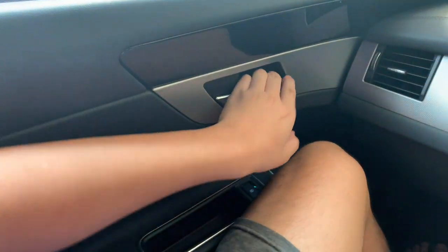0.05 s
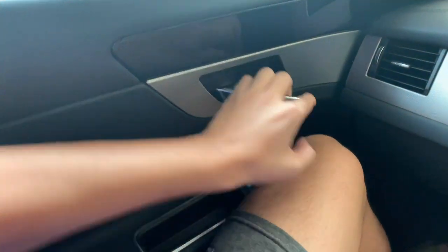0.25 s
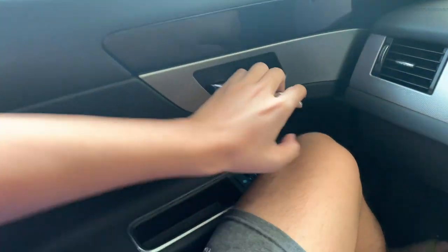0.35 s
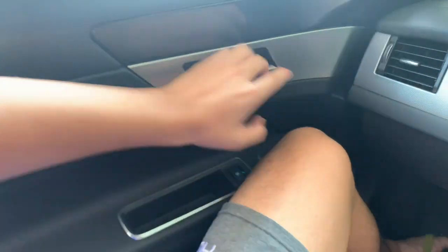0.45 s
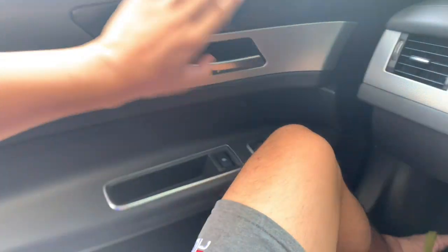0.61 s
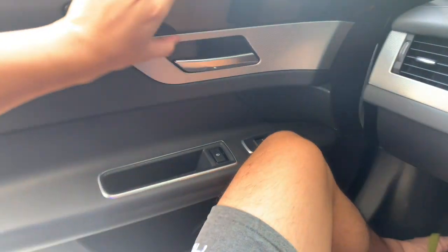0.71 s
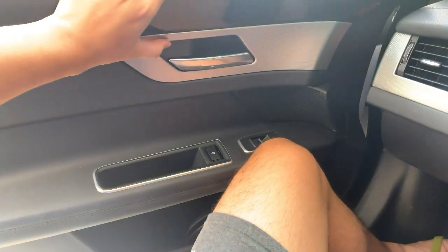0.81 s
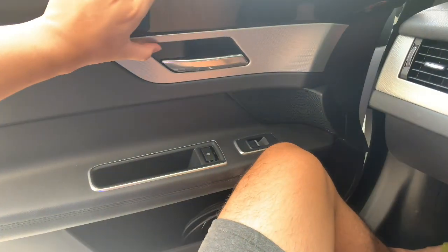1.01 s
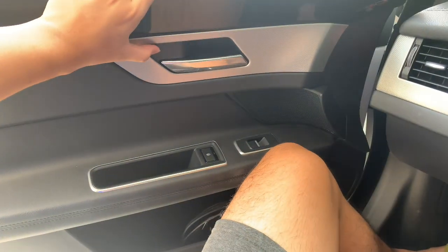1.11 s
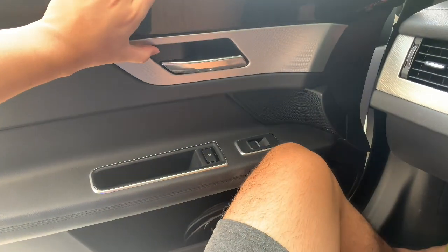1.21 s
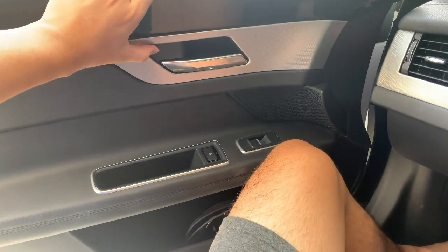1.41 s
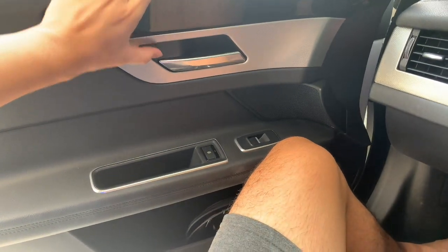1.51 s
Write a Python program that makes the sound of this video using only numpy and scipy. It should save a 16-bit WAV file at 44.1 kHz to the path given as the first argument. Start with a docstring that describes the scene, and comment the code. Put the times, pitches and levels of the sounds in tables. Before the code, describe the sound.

A car door handle is worked from inside, with a rattling clunk then a loud snap back

```python
"""Car door lever from inside

A hand works the lock lever and handle of a parked car's passenger door: clicks of banded noise and decaying
sines make the linkage rattle, the latch clunk, the lever snap home and the hollow door panel boom.
Shaped noise brushes the plastic trim, with a few small ticks; behind lie a low cabin hum, made of wavering
sines, and noise for rumble and the air of the vents."""
import sys
import numpy as np
from scipy import signal
from scipy.fft import rfft, irfft
from scipy.io import wavfile

SR = 44100
rng = np.random.default_rng(int(sys.argv[2]) if len(sys.argv) > 2 else 0)


def generate_wav(signal):
    """Clip the signal to [-1, 1] and save it as 16-bit WAV at the path in sys.argv[1]."""
    frames = np.transpose(np.atleast_2d(signal))
    scaled = np.clip(frames, -1, 1) * 32767
    pcm = np.round(scaled).astype(np.int16)
    wavfile.write(sys.argv[1], SR, pcm)


N = 68355
T = np.arange(N) / SR

# Sound of skin sliding on plastic. Each row: frequency in Hz, relative density in dB per Hz.
SKIN_COLOUR = [(800, -11), (1800, 4), (4000, 4), (7000, -1.5), (10000, -8.5), (13000, -8.5), (16000, -13)]


def from_db(db):
    """Decibels to gain."""
    return 10 ** (np.asarray(db) / 20)


def rms_one(x):
    """Scale to unit rms."""
    return x / np.sqrt(np.mean(x ** 2) + 1e-20)


def at_hz(points, hz, axis=1):
    """Read a column of a table on a log-frequency axis."""
    points = np.array(points)
    return np.interp(np.log(hz), np.log(points[:, 0]), points[:, axis])


def swell(points):
    """Gain over time from (s, dB) points."""
    return from_db(np.interp(T, *np.transpose(points)))


def decay(age_s, t60_s):
    """Exponential decay, 60 dB down after t60."""
    return np.exp(-np.log(1000) * age_s / t60_s)


def drift(corner_hz):
    """Random modulation with rms 1, weakening above the corner."""
    f = np.fft.rfftfreq(2 * N, 1 / SR)
    spectrum = rfft(rng.standard_normal(2 * N)) / (1 + (f / corner_hz) ** 2)
    return rms_one(irfft(spectrum)[:N])


def noise(colour, tilt_db_per_octave=0, low_hz=10):
    """Noise of a given colour, tilted and cut below low_hz; rms 1."""
    f = np.fft.rfftfreq(2 * N, 1 / SR) + 1
    gain = from_db(at_hz(colour, f) + tilt_db_per_octave * np.log2(f))
    gain = gain / np.sqrt(1 + (low_hz / f) ** 8)
    return rms_one(irfft(rfft(rng.standard_normal(2 * N)) * gain)[:N])


def ring(hits, modes, build_s):
    """Blows set a body's modes swinging; they build up briefly and die away."""
    out = np.zeros(N)
    for start_s, hit_db in hits:
        age = np.maximum(T - start_s, 0)
        build = 1 - np.exp(-age / build_s)
        for hz, mode_db, t60_s in modes:
            out += from_db(hit_db + mode_db) * build * decay(age, t60_s) * np.sin(2 * np.pi * hz * age)
    return out


def clicks(hits, colour, size=14000):
    """Hard contacts: a crack, dense ringing with its own decay per third octave, a faint cabin tail."""
    crack_decay_s = 0.00082
    tail_db, tail_t60_s = -37, 0.85
    alike = 0.56  # share of the noise power common to all contacts on one part
    age = np.arange(size) / SR
    crack = np.exp(-age / crack_decay_s)
    tail = from_db(tail_db) * decay(age, tail_t60_s)
    common = rng.standard_normal((2, size))
    own = rng.standard_normal((len(hits), 2, size))
    grain = np.sqrt(alike) * common + np.sqrt(1 - alike) * own

    out = np.zeros(N + size)
    edges_hz = 200 * 2 ** (np.arange(20) / 3)
    for k, (low, high) in enumerate(zip(edges_hz, edges_hz[1:])):
        hz = np.sqrt(low * high)
        octaves = np.log2(hz / 2500)  # tilt pivots at 2500 Hz
        ringing = tail + decay(age, at_hz(colour, hz, axis=2))
        drive = np.full(N + size, 1e-18)
        for (start_s, hit_db, tilt_db, crack_db), white in zip(hits, grain):
            start = int(start_s * SR)
            gain = from_db(hit_db + at_hz(colour, hz) + tilt_db * octaves)
            envelope = ringing + from_db(crack_db) * crack
            drive[start:start + size] += gain * envelope * white[k % 2]  # neighbour bands differ
        band = signal.butter(2, [low, high], "band", fs=SR, output="sos")
        out += signal.sosfilt(band, drive)
    return .5 * out[:N]


def lever():
    """The lever snaps home and bounces; it clacks, its bezel rings on and its return spring pings."""
    # Each row: start in s, relative level in dB, treble tilt in dB per octave, crack over the ringing in dB.
    snaps = [(.519, -27, -9, -16), (.5243, -20.5, 2.5, -14), (.5326, -8.5, 0.8, 7.5),
             (.5362, -4.5, -0.2, 8), (.5452, -15.5, 5.5, -18), (.5507, -9.5, -6, 2), (.5615, -16, -3.5, -3)]
    # Dense ringing of the snaps. Each row: frequency in Hz, relative level in dB, t60 in s.
    snap_ring = [(255, 2, 0.15), (444, 2.5, 0.1), (640, -2.5, 0.068), (1280, 7.5, 0.027),
                 (1740, 5.5, 0.034), (2430, -7, 0.068), (4600, -4, 0.049), (6630, -13.5, 0.07),
                 (9050, -17.5, 0.085), (12800, -19.5, 0.067), (15500, -31, 0.081)]
    # Lever's short clack and spring jolts. Each row: start in s, relative level in dB.
    clacks = [(.5331, 1.5), (.5362, -7.5)]
    pings = [(.2066, -7.5), (.2103, -8.5), (.5362, -9), (.5452, -1)]
    # Modes of lever, plastic bezel, return spring. Each row: frequency in Hz, relative level in dB, t60 in s.
    lever_modes = [(1406, -1, 0.011), (1568, 7.5, 0.0089), (2060, 0, 0.011), (3030, -12.5, 0.014),
                   (4100, -9, 0.006)]
    bezel_modes = [(782, -23, 0.14), (910, -22, 0.098), (960, -30, 0.14), (1185, -28, 0.082),
                   (1262, -18, 0.092), (1370, -24, 0.046), (1478, -16.5, 0.099), (1676, -17, 0.072),
                   (1723, -21, 0.053), (1934, -27, 0.054), (2065, -23.5, 0.085), (2280, -30, .06),
                   (3280, -23, 0.045)]
    spring_modes = [(3340, -33, 0.081), (4485, -26.5, 0.029), (4860, -34, 0.041), (6627, -33, 0.036),
                    (8630, -33, 0.062), (9330, -31.5, 0.031)]
    clack = ring(clacks, lever_modes, build_s=0.0019) + ring(clacks, bezel_modes, build_s=0.0055)
    return clicks(snaps, snap_ring) + clack + ring(pings, spring_modes, build_s=0.0004)


def door_panel():
    """The lever's blows spread into the hollow panel, whose low modes boom."""
    # Each row: start in s, relative level in dB.
    booms = [(.5395, 2), (.5471, -1.5), (.5626, -3.5)]
    # Each row: frequency in Hz, relative level in dB, t60 in s.
    panel_modes = [(79.45, -20.5, 0.59), (111, -25.5, 0.91), (120.2, -13.5, 0.33), (193.6, -7, 0.15),
                   (237.2, -8, 0.11), (289, -15, 0.15), (359.7, -12.5, 0.15), (405, -22, 0.087),
                   (446.4, -32, 0.26)]
    return ring(booms, panel_modes, build_s=0.0021)


def latch():
    """The latch goes over with clunks and the door shifts in its seal with low thuds."""
    # Latch clunks and seal thuds. Each row: start in s, relative level in dB.
    clunks = [(.2406, -12), (.2568, 5.5), (.2601, -1), (.2635, -1.5), (.2814, -6.5)]
    thuds = [(.2608, 6), (.2712, 4.5), (.2975, 2), (.3835, -24), (.419, -12.5)]
    # Modes of latch and seal. Each row: frequency in Hz, relative level in dB, t60 in s.
    latch_modes = [(110.4, -11, 0.11), (193.6, -18.5, 0.21), (328, 1.5, 0.016), (424, -16.5, 0.096),
                   (510, -17.5, 0.084), (568, -19.5, 0.063)]
    seal_modes = [(53.4, -4, 0.036), (80, -24, 0.1), (115.8, -10.5, 0.075)]
    return ring(clunks, latch_modes, build_s=0.0012) + ring(thuds, seal_modes, build_s=0.0024)


def linkage():
    """The linkage rattles through its play and its knocks ring the steel rod."""
    # Each row: start in s, relative level in dB, treble tilt in dB per octave,
    # crack over the ringing in dB, knock on the rod in dB.
    contacts = [(0.2072, -16, 0, 8, -27), (0.2101, -23, 0.5, 22, -25), (0.2207, -23, 4, -1, -34),
                (0.231, -16.5, -0.5, -5, -11), (0.2400, -21.5, -5, 14, -12),
                (0.2539, -14.5, -3.5, 3.5, -16), (0.2611, -15, -5, 7, -24), (0.2704, -18, 2.5, -11, -16),
                (0.2745, -16.5, -3, 16, -7), (.283, -14.5, -0.5, 2, -12.5), (0.2903, -29.5, 7, 13.5, -17),
                (.298, -19, -2, 0, -14.5), (0.3434, -22.5, -1, -11, -24)]
    # Dense ringing, then rod modes. Each row: frequency in Hz, relative level in dB, t60 in s.
    linkage_ring = [(236, 10.5, 0.15), (526, 2.5, 0.077), (805, -4.5, 0.24), (1300, -3.5, 0.061),
                    (1890, -12, 0.15), (2930, -14, 0.19), (5230, -7, 0.02), (8350, -22, 0.13),
                    (10900, -15.5, 0.063), (16000, -23, .04)]
    rod_modes = [(1045, -19.5, 0.054), (1217, -15, 0.037), (1330, -11, 0.029), (1403, -14.5, 0.035),
                 (1770, -21, 0.065), (2230, -18.5, 0.039), (2822, -16.5, 0.026), (3510, -25.5, .045)]
    rattle = clicks([row[:4] for row in contacts], linkage_ring)
    knocks = [(start_s, rod_db) for start_s, *_, rod_db in contacts]
    return rattle + ring(knocks, rod_modes, build_s=0.00069)


def rod_scrape():
    """The rod scrapes in its guide, sticking between short runs: grainy noise that swells and fades."""
    # Each row: time in s, level in dB.
    scrape_level = [(.205, -82), (.212, -48), (.229, -34.5), (.234, -25.5), (.243, -23.5), (.251, -40),
                    (.256, -25), (.268, -28), (.276, -22), (.281, -30), (.299, -32), (.312, -56),
                    (.335, -73)]
    # Each row: frequency in Hz, relative density in dB per Hz.
    rod_colour = [(400, 12.5), (600, 3), (850, -15), (1350, 3), (2000, -3.5), (3100, -3), (4500, -14),
                  (8000, -27), (16000, -36)]
    grain_db, grain_hz = 2.5, 400
    grain = from_db(grain_db * drift(grain_hz))
    return swell(scrape_level) * grain * noise(rod_colour, low_hz=370)


def trim_ticks():
    """Fingers tick on the trim and its strip rings under each tick."""
    # Each row: start in s, relative level in dB, treble tilt in dB per octave, crack over the ringing in dB.
    ticks = [(0.1331, -37, 0, 9), (.1642, -36, -1.5, 10.5), (0.628, -37, 0, -3), (0.6743, -34, 3, -1),
             (0.76, -34.5, 7, -12), (0.8388, -25.5, 1.5, -4), (.899, -30.5, 3, -5)]
    # Dense ringing, then strip modes. Each row: frequency in Hz, relative level in dB, t60 in s.
    trim_ring = [(400, -12, 0.24), (1500, 5.5, 0.064), (2700, -1.5, 0.042), (3530, -3, 0.07),
                 (5600, -4, 0.028), (9000, -14.5, 0.095), (16000, -19, 0.055)]
    trim_modes = [(2115, -10, 0.03), (3116, -13, 0.031), (3753, -6.5, 0.027), (4700, -19, .025),
                  (7920, -17, 0.023)]
    taps = [(start_s, tick_db) for start_s, tick_db, *_ in ticks]
    return clicks(ticks, trim_ring) + ring(taps, trim_modes, build_s=0.0014)


def brushing():
    """Skin slides over plastic: strokes of grainy noise with smooth ends."""
    # Each row: start in s, rise in s, hold in s, release in s, level in dB, treble tilt in dB per octave.
    brushes = [(-.02, 0.014, 0.025, 0.073, -43, -2), (0.129, 0.0075, 0.01, 0.019, -49.5, -2.5),
               (0.361, 0.029, 0.0037, 0.033, -46, 5.5), (0.424, 0.071, 0.071, .03, -60.5, -5),
               (0.686, 0.046, 0.045, 0.063, -43.5, 14.5), (0.754, 0.016, 0.067, 0.068, -52, 2.5)]
    grain_db, grain_hz = 0.5, 150
    out = np.zeros(N)
    for start_s, rise_s, hold_s, release_s, level_db, tilt_db in brushes:
        end_s = start_s + rise_s + hold_s + release_s
        ramp = np.clip(np.minimum((T - start_s) / rise_s, (end_s - T) / release_s), 0, 1)
        stroke = np.sin(np.pi / 2 * ramp) ** 2
        gain = from_db(level_db + grain_db * drift(grain_hz))
        out += stroke * gain * noise(SKIN_COLOUR, tilt_db, low_hz=700)
    return out


def grip():
    """Fingers resting on the trim rub faintly: treble skin noise at a varying level."""
    # Each row: time in s, level in dB.
    grip_level = [(0, -72), (.19, -76), (.3, -57), (.42, -63), (.52, -54.5), (.68, -70), (.9, -54.5),
                  (.96, -76)]
    return swell(grip_level) * noise(SKIN_COLOUR, low_hz=3000)


def hum():
    """Low sines waver in phase and level; the strongest, at 163 Hz, swells and fades."""
    # Weaker wavering lines. Each row: frequency in Hz, level in dB.
    hum_lines = [(82, -40), (297, -51.5)]
    # Strongest line. Each row: time in s, level in dB.
    drone_level = [(0, -42), (.38, -38), (.46, -34), (.52, -33.5), (.85, -45), (.885, -23.5), (.94, -43.5),
                   (1.03, -27.5), (1.08, -38), (1.29, -37), (1.35, -27), (1.39, -41.5), (1.5, -30.5),
                   (1.55, -46)]
    waver_db, waver_hz, wander_rad, drone_hz = 4.5, 5.9, 0.8, 163
    out = swell(drone_level) * np.sin(2 * np.pi * drone_hz * T + wander_rad * drift(waver_hz))
    for hz, line_db in hum_lines:
        gain = from_db(line_db + waver_db * drift(waver_hz))
        out += gain * np.sin(2 * np.pi * hz * T + wander_rad * drift(waver_hz))
    return out


def rumble():
    """Low-passed noise whose level rises and falls."""
    # Each row: frequency in Hz, relative density in dB per Hz.
    rumble_colour = [(25, -8.5), (50, -1), (85, -4), (125, 2.5), (165, -4.5), (240, -2), (320, -25),
                     (450, -57)]
    # Level ahead of the low-pass loss. Each row: time in s, level in dB.
    rumble_level = [(0, -39), (.2, -37.5), (.36, -30), (.6, -36.5), (1.12, -38), (1.55, -37.5)]
    low_pass = signal.butter(4, 450, fs=SR, output="sos")
    return swell(rumble_level) * signal.sosfilt(low_pass, noise(rumble_colour))


def vent_air():
    """Air rushes from the vents: noise falling off toward the treble, above the hum."""
    # Each row: frequency in Hz, relative density in dB per Hz.
    air_colour = [(300, -9.5), (390, -15.5), (520, -21), (620, -19), (760, -26), (1200, -24), (1600, -29),
                  (2300, -36), (4000, -41), (5200, -46.5), (7200, -47), (8200, -53), (9600, -53),
                  (10500, -58), (13000, -60), (16000, -77)]
    # Each row: time in s, level in dB.
    air_level = [(0, -44.5), (.12, -48.5), (.2, -48), (.45, -43.5), (.62, -44), (.78, -39), (1.05, -39.5),
                 (1.55, -39.5)]
    return swell(air_level) * noise(air_colour, low_hz=292)


def scene():
    """Door, hand and cabin, heard from the seat."""
    door = lever() + door_panel() + latch() + linkage() + rod_scrape()
    hand = trim_ticks() + brushing() + grip()
    cabin = hum() + rumble() + vent_air()
    return (door + hand + cabin)[None]


def record(dry):
    """The deepest bass is thinned, the loudest peaks are rounded and the top is cut."""
    low_cut_hz, top_cut_hz, ceiling = 43.5, 15800, 0.92
    high_pass = signal.butter(3, low_cut_hz, "high", fs=SR, output="sos")
    thin = signal.sosfilt(high_pass, dry)
    rounded = thin / (1 + (thin / ceiling) ** 6) ** (1 / 6)
    low_pass = signal.ellip(10, .1, 80, top_cut_hz, fs=SR, output="sos")
    return signal.sosfilt(low_pass, rounded)


dry = scene()
out = record(dry)
generate_wav(out)
```